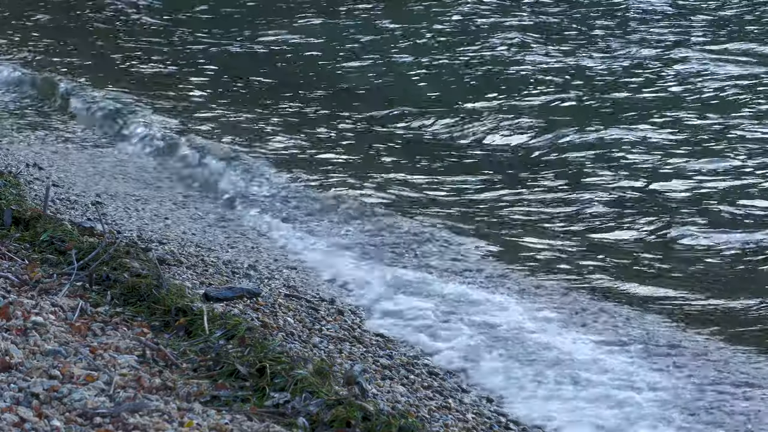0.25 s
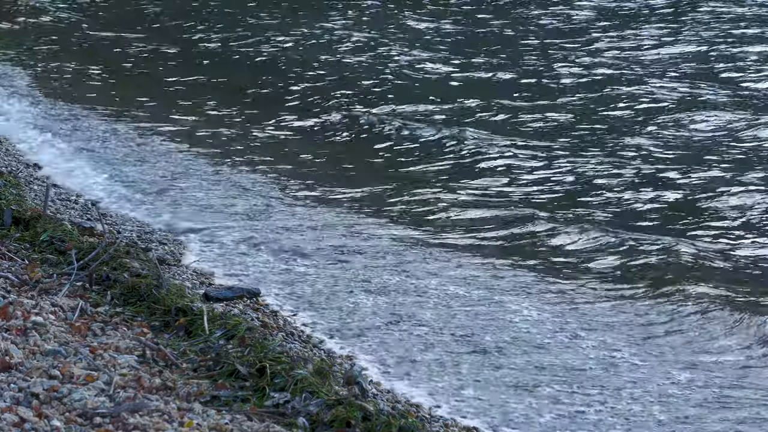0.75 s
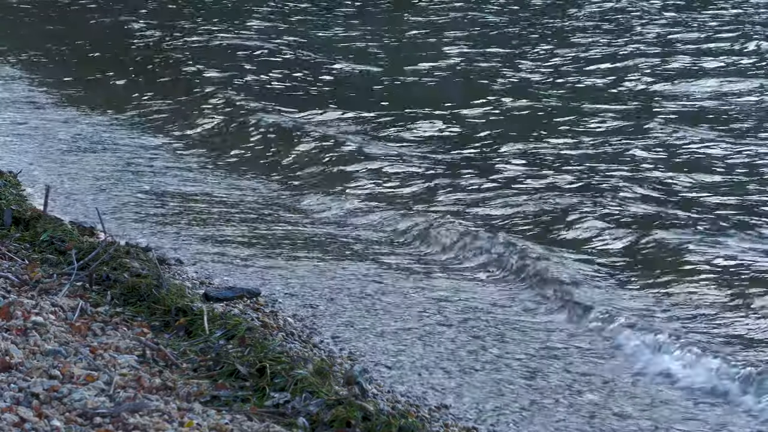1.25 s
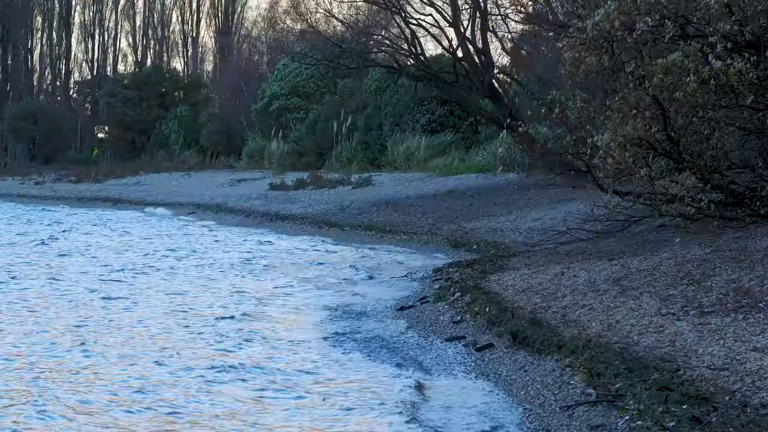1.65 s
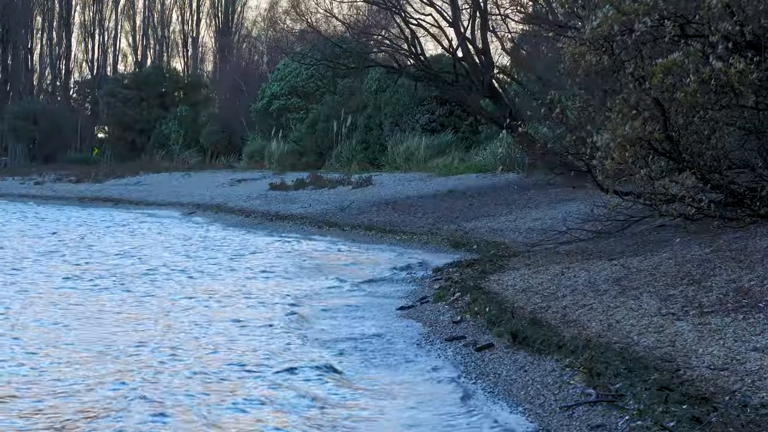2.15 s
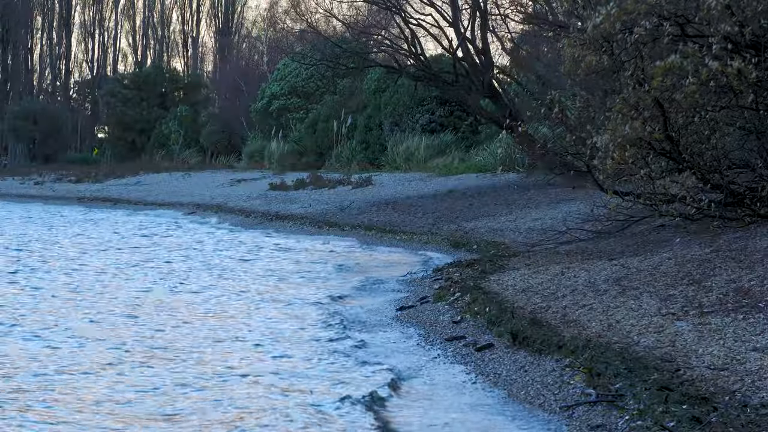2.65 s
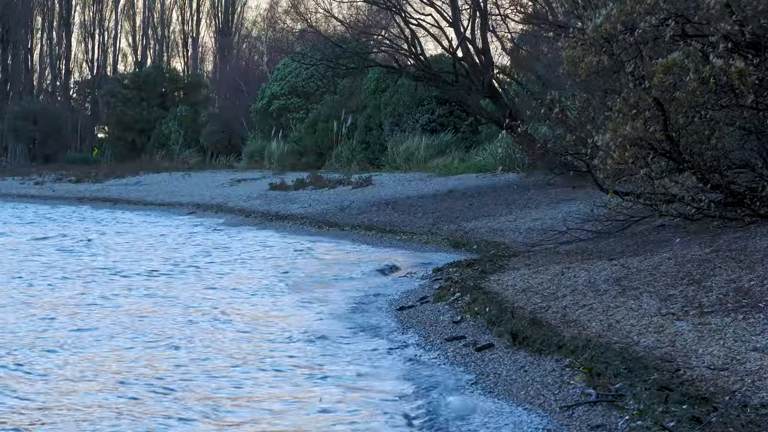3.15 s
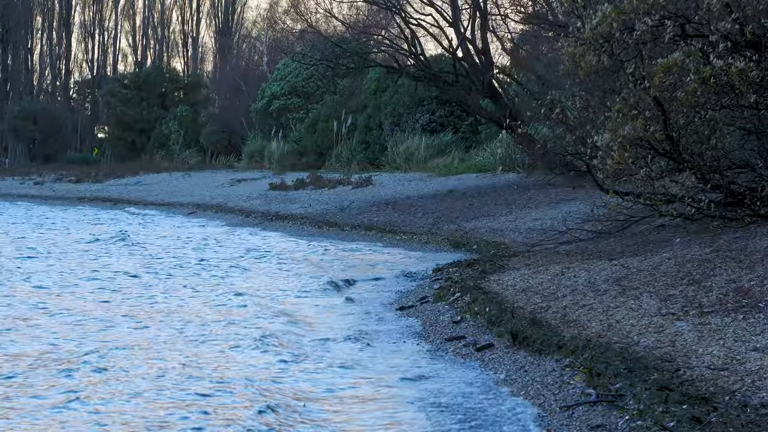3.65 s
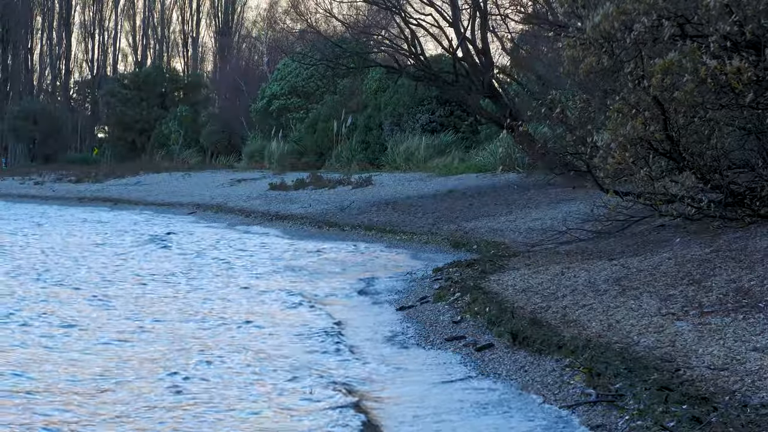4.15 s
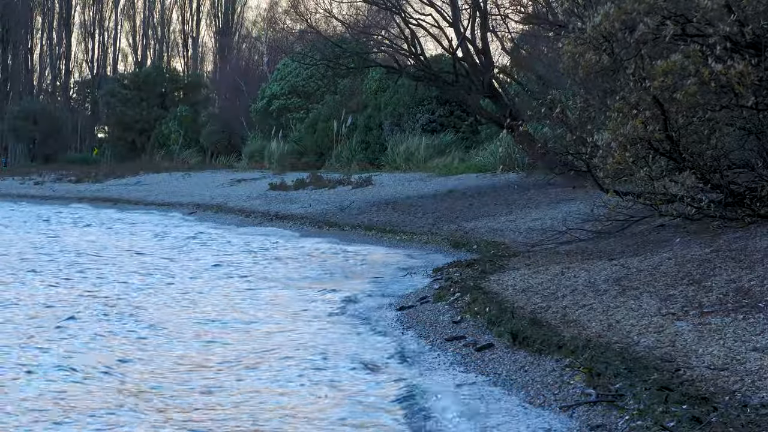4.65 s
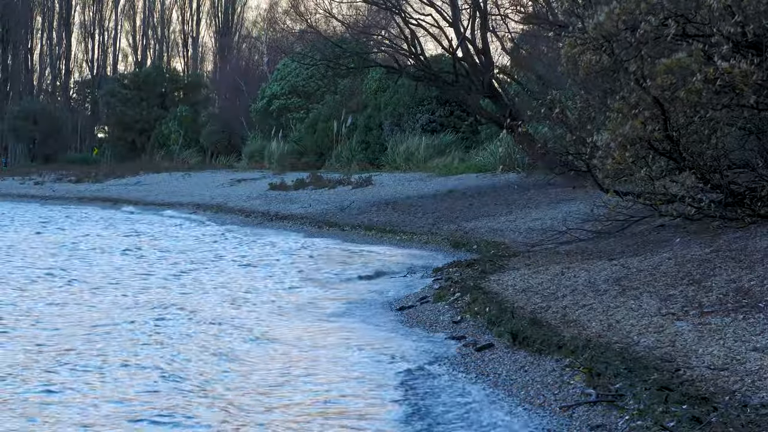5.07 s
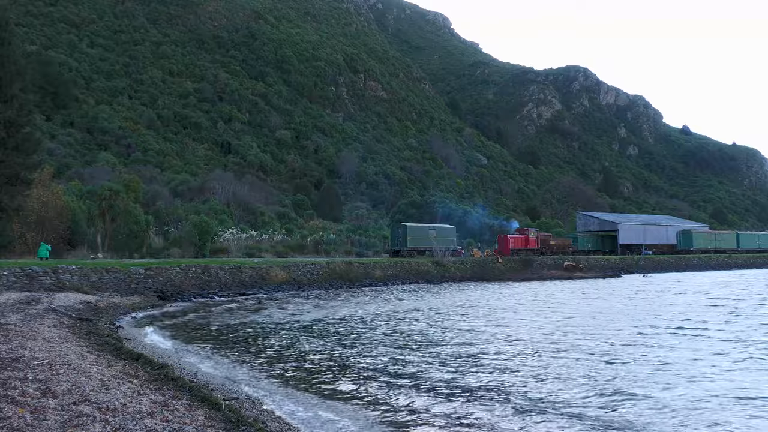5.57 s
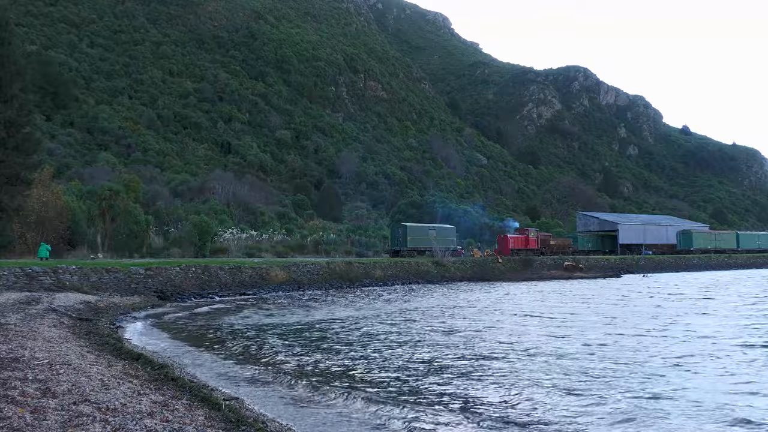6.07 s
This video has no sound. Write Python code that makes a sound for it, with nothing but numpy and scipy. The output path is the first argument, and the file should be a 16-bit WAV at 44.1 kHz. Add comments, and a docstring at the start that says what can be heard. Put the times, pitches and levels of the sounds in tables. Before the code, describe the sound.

Low, fluttering wind noise buffets the microphone at the edge of a lake, where gentle waves keep swelling and falling back over a stony beach. About five waves arrive in turn, each gurgling as it breaks and then hissing softly as it recedes. Occasional water plops and light clicks of rolling pebbles dot the wash, over a steady murmur of more distant ripples.

```python
"""Small lake waves break on a pebble shore, about one every 1.4 s: each tumbles with a gurgle of
bubbles, runs up the stones as a fizzing wash and drains away, with a few plops and pebble ticks.
The rest of the shore murmurs behind, and wind rumbles on the microphone."""
import sys
import numpy as np
from scipy import signal
from scipy.fft import rfft, irfft, next_fast_len
from scipy.io import wavfile
from scipy.ndimage import map_coordinates

SR = 44100
rng = np.random.default_rng(int(sys.argv[2]) if len(sys.argv) > 2 else 0)


def dump_mix(stems):
    """Bounce the given channels to the path in sys.argv[1] as a 16-bit WAV at rate SR."""
    frames = np.atleast_2d(stems).T  # one column per channel
    limited = np.clip(frames, -1, 1)  # hard clip at full scale
    pcm = np.round(limited * 32767).astype(np.int16)
    wavfile.write(sys.argv[1], SR, pcm)


N = 278666

# breaking crests; a wave that meets the shore aslant breaks more than once
# (time [s], rise [s], hold [s], drain [dB/s], tumble [dB], wash [dB], foam [dB])
CRESTS = [(0.0, 0.11, 0.062, 35, -34, -41.5, -58), (0.108, 0.4, 0.18, 13.5, -37, -39, -51.5),
          (1.28, 0.17, 0.055, 26, -50, -49.5, -74), (1.56, 0.19, 0.25, 26.5, -39, -41, -54.8),
          (2.838, 0.21, .05, 22, -44.5, -43.5, -58), (3.02, 0.17, .01, 11.5, -40, -43, -59),
          (4.03, 0.13, 0.57, 18, -42, -42, -56), (4.307, 0.19, .2, 53, -38.5, -49.5, -61),
          (5.89, 0.25, 0.28, 14, -44, -47.5, -64.5), (6.196, 0.2, 0.045, 32, -45, -46.5, -60.5)]
# large single bubbles (time [s], level [dB], pitch [Hz], t60 [s])
PLOP_EVENTS = [(.04, -26, 660, 0.052), (.154, -26, 647, 0.052), (1.417, -26.5, 1094, 0.045),
               (2.637, -21, 3180, 0.0056), (2.661, -34, 2020, 0.028), (4.308, -19.5, 393, 0.099),
               (4.319, -21, 409, 0.083), (5.795, -23.5, 980, 0.024)]
# pebble knocks (time [s], peak [dB], pitch [Hz])
PEBBLE_KNOCKS = [(.586, -33, 4540), (0.964, -40.5, 5200), (1.267, -38, 4600), (2.587, -43, 5400),
                 (2.7637, -35, 8000), (2.868, -46, 12000), (3.0055, -39, 6500), (3.03, -41, 11000),
                 (3.241, -46, 6400), (3.9185, -41, 5000), (4.626, -47, 12000), (5.841, -47, 7000),
                 (5.845, -43, 6400)]
# wind strength (time [s], buffet [dB], flutter [dB])
WIND_LEVELS = [(0, -31.5, -34.5), (.7, -35.5, -38), (1.33, -32.5, -36), (1.45, -34, -31),
               (2.15, -30.5, -30.5), (2.62, -32, -33), (3.3, -28.5, -27.5), (3.7, -32.5, -29),
               (4.25, -31.5, -29.5), (4.6, -30.5, -34.5), (5.1, -30.5, -32.5), (5.6, -36, -35.5),
               (6.32, -31.5, -37)]
# gusts on the microphone (time [s], length [s], swell [dB])
WIND_GUSTS = [(0.244, 0.073, 4), (0.894, 0.062, 3.5), (1.433, 0.055, 4), (1.94, 0.074, 0), (2.755, .1, 4.5),
              (3.112, 0.11, 2), (4.194, .1, 1), (5.068, 0.23, 1.5), (5.805, 0.17, 3.5), (6.27, 0.15, 5)]
# spectra of the water and wind layers (frequency [Hz], relative gain [dB])
TUMBLE_SPECTRUM = [(120, -23), (280, 4.5), (450, 0), (650, 0.5), (950, -6), (1450, -6), (2000, -16),
                   (3500, -16), (6000, -42)]
WASH_SPECTRUM = [(400, -9.5), (900, 4.5), (1500, 0.5), (2000, -0.5), (2700, -2), (3550, -2.5), (4000, -8),
                 (4500, -15), (5500, -27.5), (8000, -31), (15000, -64)]
FOAM_SPECTRUM = [(2000, -25), (4000, 2.5), (5500, 2), (7000, -3), (9000, -6.5), (12500, -8.5),
                 (15500, -11.5)]
BUFFET_SPECTRUM = [(15, -24), (30, -16.5), (48, -9), (65, -3.5), (90, -2), (125, -3), (180, -8),
                   (280, -31.5), (600, -43), (2000, -90)]
FLUTTER_SPECTRUM = [(60, -15), (120, -5), (175, -1.5), (220, -3.5), (280, -9), (360, -14.5), (500, -23.5),
                    (1200, -61), (4000, -96)]
SHORE_SPECTRUM = [(100, -13), (400, 2), (800, 1), (1100, -3.5), (1500, 2), (2000, -10.5), (3500, -13),
                  (4700, -39), (8000, -29.5), (15500, -28.5)]


def waves():
    """Big bubbles gurgle as a crest falls, small ones seethe over the stones, foam crackles."""
    # big bubbles come up after the first spray
    tumble_db = surge_db(layer=0, lapping_db=-54.5, drain_scale=1.06, lag_s=0.048) + 0.5
    wash_db = surge_db(layer=1, lapping_db=-59.5, drain_scale=0.95) + 2.26
    foam_db = surge_db(layer=2, lapping_db=-69.5, drain_scale=1.13) + 1.0
    gurgle = bubbles(count=4000, low_hz=380.6, high_hz=1845, cycles=7.3, spread_db=1.5, rise=0.12)
    seethe = bubbles(count=12000, low_hz=987, high_hz=4990, cycles=8.0, spread_db=1.5, rise=0.056)
    crackle = bubbles(count=14000, low_hz=4100, high_hz=14500, cycles=11, spread_db=5.5, rise=0.02)
    # noise: countless smaller bursts blurred into a rush
    tumble = amp(tumble_db) * coloured(gurgle + amp(7.0) * noise(), TUMBLE_SPECTRUM)
    wash = amp(wash_db + 0.45 * wobble(30)) * coloured(seethe + amp(6.5) * noise(), WASH_SPECTRUM)
    foam = amp(foam_db + 0.61 * wobble(35)) * coloured(crackle + amp(6.5) * noise(), FOAM_SPECTRUM)
    return tumble + wash + foam


def surge_db(layer, lapping_db, drain_scale, lag_s=0):
    """Level of one wave layer: each crest swells, holds during run-up, drains to the lapping floor."""
    t = np.maximum(np.arange(N) / SR - lag_s, 0)
    power = amp(lapping_db) ** 2
    for crest_s, rise_s, hold_s, drain_db_per_s, *levels_db in CRESTS:
        swell = np.exp(-(np.minimum(t - crest_s, 0) / rise_s) ** 2)
        draining_s = np.maximum(t - crest_s - hold_s, 0)
        ebb = amp(levels_db[layer] - drain_scale * drain_db_per_s * draining_s)
        power = power + (swell * ebb) ** 2
    return 10 * np.log10(power)


def bubbles(count, low_hz, high_hz, cycles, spread_db, rise):
    """Bubble cloud at rms 1: damped sines, each rising in pitch as it nears the surface."""
    when, pitch, strength, life = rng.random((count, 4)).T[:, :, None]
    hz = low_hz * (high_hz / low_hz) ** pitch
    tau_s = cycles * (0.5 + life) / hz / np.pi
    t = np.arange(int(2 * cycles / low_hz * SR)) / SR
    gain = amp(-spread_db * np.log(1 - 0.99 * strength)) * hz / low_hz
    glide = 1 + rise * (1 - np.exp(-t / tau_s / 4))
    rings = gain * np.sin(2 * np.pi * hz * t * glide) * np.exp(-t / tau_s)
    index = (when * N).astype(int) + np.arange(len(t))
    return unit(np.bincount(index.ravel(), rings.ravel(), N)[:N])


def plops():
    """Trapped air pockets ring briefly, gliding up, with a small splash near their pitch."""
    rise, attack_s = 0.21, 0.00059
    out = np.zeros(N + SR)
    t = np.arange(SR // 8) / SR
    for start_s, level_db, pitch_hz, t60_s in PLOP_EVENTS:
        glide_hz = pitch_hz * (1 + rise * np.minimum(t / t60_s, 1))
        ring = np.sin(2 * np.pi * np.cumsum(glide_hz) / SR)
        resonance = signal.iirpeak(1.11 * pitch_hz, Q=2, fs=SR)
        splash = unit(signal.lfilter(*resonance, rng.standard_normal(len(t))))
        splash = signal.lfilter(*signal.butter(4, 3800, fs=SR), splash)
        envelope = amp(level_db - 60 * t / t60_s) * (1 - np.exp(-t / attack_s))
        out[round(start_s * SR):][:len(t)] += envelope * (ring + 0.54 * splash)
    return out[:N]


def pebbles():
    """Stones rolled by the water knock together: dry ticks with a broad resonance."""
    t60_s = 0.0074
    out = np.zeros(N + SR)
    t = np.arange(SR // 40) / SR
    for start_s, peak_db, pitch_hz in PEBBLE_KNOCKS:
        impact = rng.standard_normal(len(t)) * amp(-60 * t / t60_s)
        tick = signal.lfilter(*signal.iirpeak(pitch_hz, Q=3, fs=SR), impact)
        out[round(start_s * SR):][:len(t)] += amp(peak_db) * tick / np.abs(tick).max()
    return out[:N]


def wind():
    """Eddies on the microphone: low buffet, higher flutter; short gusts swell both."""
    t = np.arange(N) / SR
    gust_db = sum(swell_db * np.exp(-(2 * (t - centre_s) / length_s) ** 2)
                  for centre_s, length_s, swell_db in WIND_GUSTS)
    buffet_db, flutter_db = curves(WIND_LEVELS)
    buffet_db += gust_db + 1.0 + 0.48 * wobble(18)
    buffet = amp(buffet_db) * coloured(noise(), BUFFET_SPECTRUM)
    flutter_db += 0.32 * gust_db + 0.93 + 1.6 * wobble(22)
    flutter = amp(flutter_db) * coloured(noise(), FLUTTER_SPECTRUM)
    return buffet + flutter


def far_shore():
    """Ripples along the rest of the beach merge into a steady murmur."""
    return amp(-46.5 + 1.14 * wobble(2.97)) * coloured(noise(), SHORE_SPECTRUM)


def amp(db):
    """Decibels to gain."""
    return 10 ** (np.asarray(db) / 20)


def unit(x):
    """Scale to rms 1."""
    return x / np.sqrt(np.mean(x ** 2) + 1e-20)


def curves(rows):
    """One value per sample for each column after the time."""
    times_s, *columns = np.transpose(rows)
    return [np.interp(np.arange(N) / SR, times_s, column) for column in columns]


def wobble(rate_hz):
    """Smooth random curve, rate_hz knots per second."""
    knots = rng.standard_normal(int(N * rate_hz / SR) + 4)
    return map_coordinates(knots, [np.arange(N) * rate_hz / SR])


def filtered(x, response):
    """FFT filter with gain response(hz)."""
    size = next_fast_len(N + SR // 2)
    return irfft(rfft(x, size) * response(np.fft.rfftfreq(size, 1 / SR)), size)[:N]


def coloured(x, spectrum):
    """x shaped by (Hz, dB) points on a log axis, at rms 1."""
    points_hz, points_db = np.transpose(spectrum)
    return unit(filtered(x, lambda hz: amp(np.interp(np.log(hz + 1), np.log(points_hz), points_db))))


def noise():
    """White noise, rms 1."""
    return rng.standard_normal(N)


def scene():
    """Shore and wind at one microphone."""
    return (waves() + plops() + pebbles() + far_shore() + wind())[None]


def record(dry):
    """Click-free fades at both ends, band limit, slight DC offset."""
    both_fades_s, cutoff_hz, dc_offset = 0.004, 15750, 0.0156
    fade = signal.windows.tukey(N, both_fades_s * SR / N)
    return filtered(dry[0] * fade, lambda hz: hz < cutoff_hz)[None] + dc_offset


dry = scene()
out = record(dry)
dump_mix(out)
```